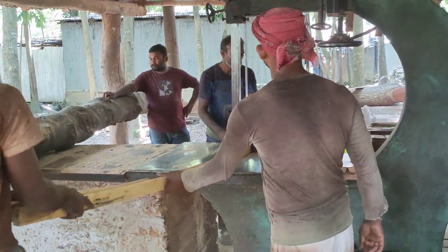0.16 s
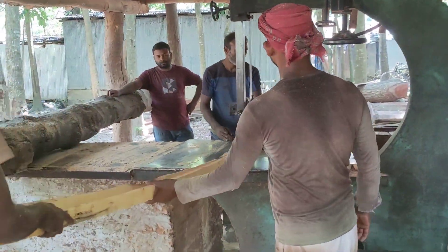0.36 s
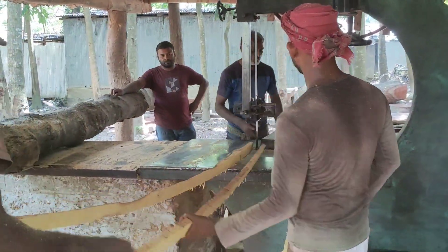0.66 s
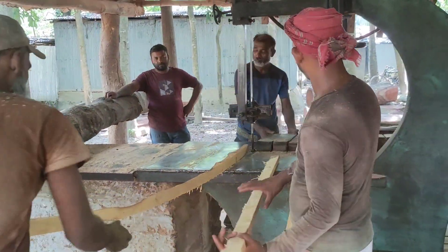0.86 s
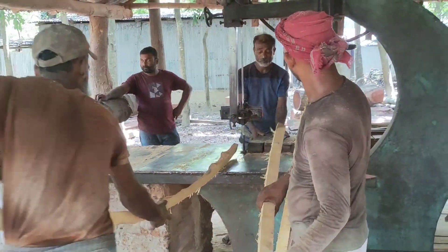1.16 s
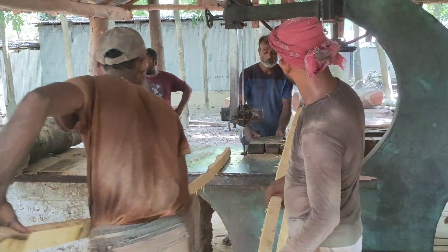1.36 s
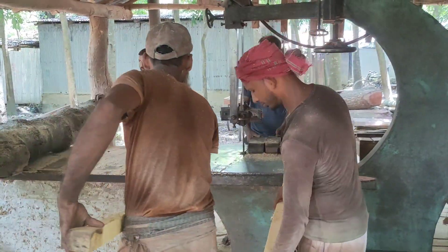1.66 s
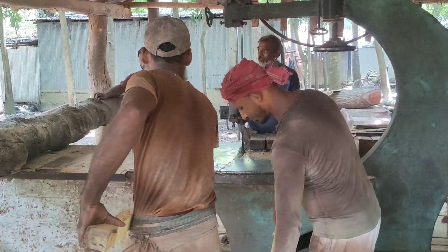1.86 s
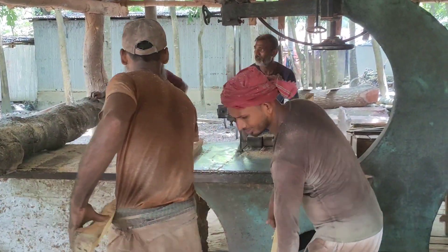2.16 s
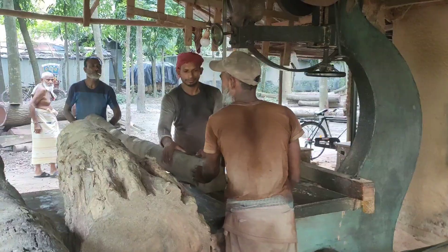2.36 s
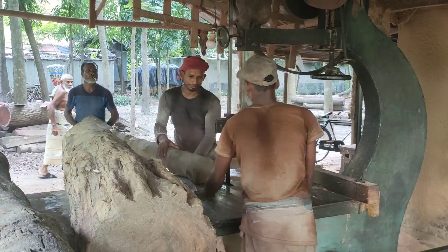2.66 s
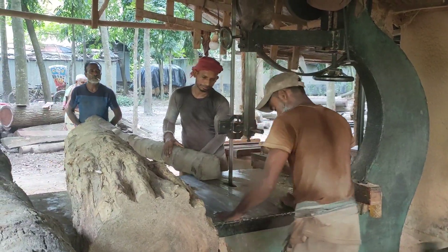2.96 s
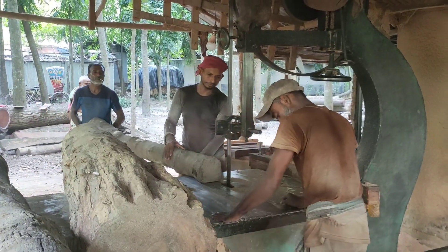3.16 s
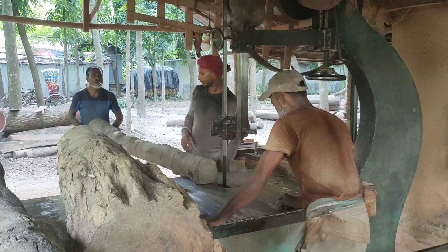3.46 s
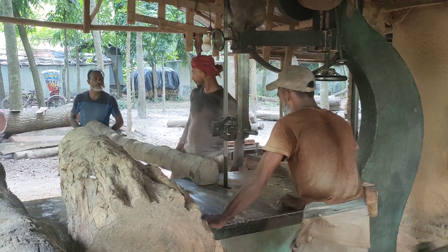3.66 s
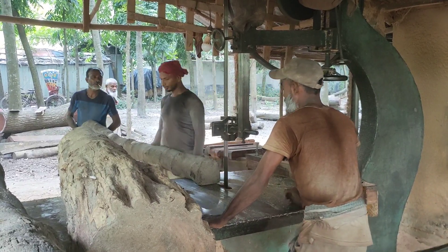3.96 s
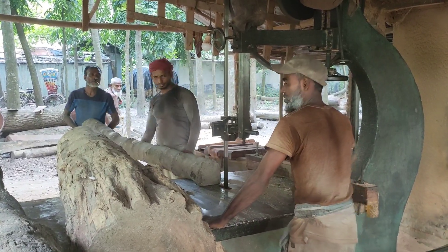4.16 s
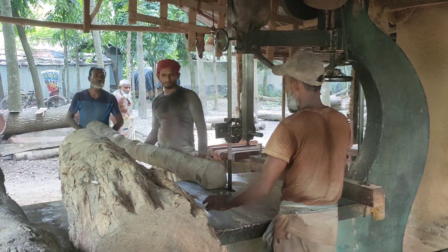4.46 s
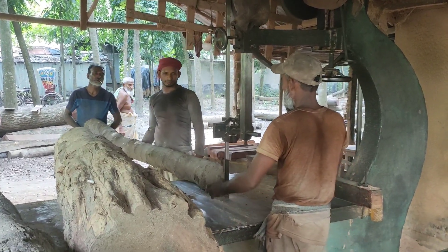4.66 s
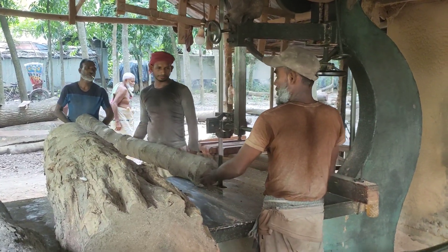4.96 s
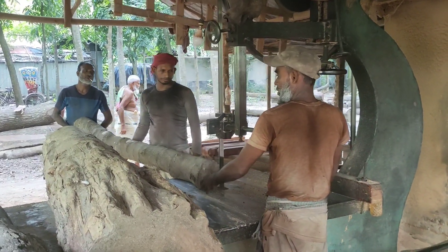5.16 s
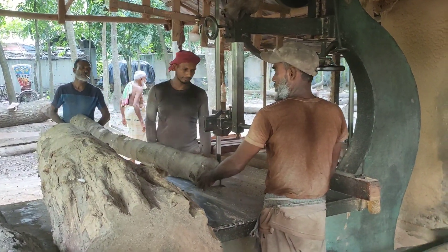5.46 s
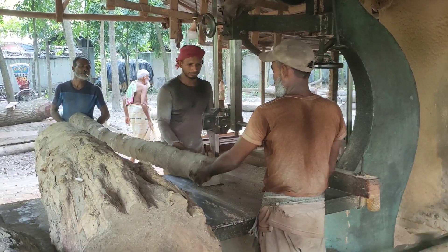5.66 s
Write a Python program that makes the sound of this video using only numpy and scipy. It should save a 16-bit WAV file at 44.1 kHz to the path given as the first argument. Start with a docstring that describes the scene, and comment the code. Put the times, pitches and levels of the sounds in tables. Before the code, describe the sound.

Heard from nearby in wide stereo, a sawmill's big band saw finishes a cut and runs free, its blade rasping and ringing over an iron rattle and a low hum. Wood bumps about and a slat clacks down. The sound cuts out for half a second, then comes back shaking harder, the blade squeaking in its guide between timber knocks. It eases off before starting a hissing cut near the end.

```python
"""A big band saw runs in an open shed, heard first from the outfeed side, where the cut wood comes out,
and then, after a short silence, from beside a log. The blade scrapes through its guides and rings near
2 kHz, and the teeth hiss when they bite. The iron frame rattles and the drive drones, throbbing as the
wheels turn. Timber knocks on the table, a plank is dragged and a slat drops. Beside the log, the blade
also squeaks about once a lap."""
import sys
import numpy as np
from scipy import signal
from scipy.fft import rfft, irfft
from scipy.io import wavfile
from scipy.ndimage import uniform_filter1d

SR = 44100
rng = np.random.default_rng(int(sys.argv[2]) if len(sys.argv) > 2 else 0)


def dump_mix(stems):
    """Bounce the given channels to the path in sys.argv[1] as a 16-bit WAV at rate SR."""
    frames = np.atleast_2d(stems).T  # one column per channel
    limited = np.clip(frames, -1, 1)  # hard clip at full scale
    pcm = np.round(limited * 32767).astype(np.int16)
    wavfile.write(sys.argv[1], SR, pcm)


N = 256220
T = np.arange(N) / SR
FREQ = np.fft.rfftfreq(N, 1 / SR) + 1e-3

# A "colour" says how strong each pitch is. Levels in a table are relative: its source adds a gain.
# colour of the scraping blade on each side: pitch_hz, level_db
OUTFEED_BLADE_COLOUR = [(900, -16.5), (1400, -11), (1920, -7.5), (2060, -4), (2450, -5.5), (3000, -9.5),
                        (3700, -15), (4900, -14.5), (5600, -13), (7800, -18), (8600, -24), (15500, -47.5)]
LOGSIDE_BLADE_COLOUR = [(1000, -8.5), (1500, -16), (1930, -10), (2070, 2), (2600, -1), (3300, -5.5),
                        (3700, -9), (4700, -9), (5700, -13), (7600, -16.5), (8500, -25.5), (15500, -36)]
# pitches at which the blade and the frame ring: pitch_hz, width_hz, lift_db
BLADE_RINGS = [(2057, 85, 6), (2300, 44, 1.5), (2878, 49, 6), (3270, 26, 7.5), (3586, 37, 7),
               (4860, 36, 6.5), (5550, 150, 4)]
FRAME_RINGS = [(593, 27, 7.5), (695, 19, 1), (950, 23, 1), (1007, 31, 4), (1117, 28, 3.5), (1368, 22, 9.5)]
# colour of the rattling frame: pitch_hz, level_db
OUTFEED_FRAME_COLOUR = [(300, -39), (480, -5.5), (600, -2.5), (750, -1.5), (870, 0.5), (1000, -1),
                        (1150, -1), (1270, -14), (1600, -20.5), (2500, -24.5)]
LOGSIDE_FRAME_COLOUR = [(300, -26), (540, -23), (600, -5), (760, 0.5), (900, 3.5), (1130, -1.5),
                        (1230, -6.5), (1650, 0.5), (1900, -1.5), (3000, -13.5)]
# colour of the rumbling wheels: pitch_hz, level_db
OUTFEED_WHEEL_COLOUR = [(20, -25.5), (40, -12.5), (85, -16.5), (115, -21.5), (160, -9), (205, 4), (260, -3),
                        (340, 2), (420, -3), (520, -0.5), (800, -13.5)]
LOGSIDE_WHEEL_COLOUR = [(20, -10), (36, -16.5), (60, -11), (85, -15), (120, -17), (165, -10), (220, -2),
                        (290, -5), (365, 2.5), (410, -9), (455, 1.5), (530, -8.5), (800, -9.5)]
# droning tones of the drive and of the frame: pitch_hz, level_db
OUTFEED_DRIVE_TONES = [(86, -76.5), (200, -53), (862, -39.5)]
LOGSIDE_DRIVE_TONES = [(81, -62), (366, -47), (451, -43.5), (1012, -40)]
LOGSIDE_FRAME_TONES = [(597, -47.5), (645, -47), (665, -48)]
# the teeth are in the wood: start_s, length_s, level_db, swell_db
BITES = [(0.0, 0.232, -32, 5.5), (5.088, 0.03, -28, 2), (5.125, 0.06, -32.5, -1), (5.188, 0.62, -40, 7.5),
         (5.262, 0.39, -32.5, 3)]
# colour of the teeth in a thin board and in the log: pitch_hz, level_db
BOARD_HISS_COLOUR = [(1800, -7), (2400, 14), (3300, -1), (4600, -3.5), (5600, 2), (7100, 4), (8400, -3.5),
                     (9800, -3), (10500, -1.5), (12600, -1.5), (13300, -0.5), (15600, -4.5)]
LOG_HISS_COLOUR = [(2000, 1), (4400, 0), (5100, 5), (5550, 13), (6200, 5), (7900, 2), (8400, -5.5),
                   (9700, -5.5), (10300, -0.5), (12300, -3), (13300, 1), (14800, -3.5), (15600, -3)]
# jolts of blade and timber on the table: start_s, chatter_s, body_db, edge_db
JOLTS = [(0.21, 0.027, -39, -34), (0.366, 0.037, -39, -37), (0.497, 0.028, -36, -35),
         (0.734, 0.028, -34, -50), (0.786, 0.028, -34.5, -48), (0.853, 0.045, -39.5, -38),
         (1.023, 0.024, -29, -34), (1.158, 0.031, -30, -46), (1.332, 0.02, -38.5, -40),
         (1.493, 0.017, -35, -32.5), (2.62, 0.025, -31, -47), (3.005, 0.032, -30.5, -37),
         (3.082, 0.023, -34, -37), (3.175, 0.027, -25.5, -35), (3.236, 0.021, -24, -25.5),
         (3.26, 0.024, -24.5, -45), (3.333, 0.021, -25.5, -23), (3.655, 0.02, -31, -22.5),
         (4.141, 0.032, -33.5, -39), (4.214, 0.013, -28.5, -30), (4.323, 0.018, -33, -35),
         (4.462, 0.018, -31.5, -27.5), (4.997, 0.021, -30, -27.5), (5.337, 0.031, -32.5, -29)]
# colours of a knock's hollow body, hard edge and low thud: pitch_hz, level_db
BODY_COLOUR = [(400, -18.5), (650, -6), (900, 0.5), (1120, 4.5), (1300, -11.5), (2000, -23.5)]
EDGE_COLOUR = [(1000, -18.5), (2100, -7), (3200, -10), (5600, -10.5), (8500, -22), (15000, -35)]
THUD_COLOUR = [(90, -32.5), (200, -4), (360, 2.5), (600, -5.5), (1000, -27.5)]
# colour of a dropped slat: pitch_hz, level_db
SLAT_COLOUR = [(300, -26.5), (700, -5), (1100, 4.5), (1600, -3), (2300, -0.5), (3200, 2), (4500, -7),
               (6000, -15.5), (12000, -31)]
# the saw shakes beside the log, then settles: time_s, blade_db, frame_db
SHAKE_LEVELS = [(2.6, -24, -35), (2.68, -22.5, -32), (3.35, -23.5, -31), (3.47, -23.5, -32.5),
                (4.65, -30, -39), (5.42, -29, -39.5), (5.75, -28.5, -41.5)]
# how strongly the drive rumbles and drones beside the log: time_s, level_db
DRIVE_LEVELS = [(2.56, -34.5), (2.67, -40.5), (3.31, -34), (3.59, -40), (3.66, -34.5), (4.13, -44),
                (4.15, -41.5), (5.34, -41.5), (5.76, -47)]
# the blade squeaks in its guide: peak_s, pitch_hz, level_db
SQUEAKS = [(2.60, 3350, -24), (2.635, 1650, -21), (3.14, 4050, -27), (3.43, 4200, -31), (3.685, 4030, -31),
           (3.975, 4060, -27), (4.228, 3970, -24.5), (4.243, 4600, -28), (4.515, 4130, -27),
           (4.77, 4110, -33), (4.82, 3940, -28), (5.30, 4130, -30)]
# stereo width, as the level of the sides against the centre: pitch_hz, side_db
STEREO_WIDTH = [(30, -21), (60, -14), (140, -7), (220, -6.5), (350, -6.5), (600, -2.5), (1100, 0),
                (2400, -0.66), (15000, -0.4)]


def undb(db):
    """Turn decibels into a number to multiply by."""
    return 10 ** (np.asarray(db) / 20)


def unit(x):
    """Scale a signal to an average (rms) strength of 1."""
    return x / np.sqrt(np.mean(x ** 2))


def curves(rows):
    """Join the rows of a time table with straight lines, one curve for each level column."""
    times, *columns = np.transpose(rows)
    return [np.interp(T, times, column) for column in columns]


def colour(x, points, rings=()):
    """Pass a sound through a body that favours some pitches and rings at a few."""
    hz, db = np.transpose(points)
    octaves_outside = np.abs(np.log2(FREQ / np.clip(FREQ, hz[0], hz[-1])))
    broad_db = np.interp(np.log(FREQ), np.log(hz), db) - 20 * octaves_outside
    ring_db = sum(lift / (1 + (2 * (FREQ - pitch) / width) ** 2) for pitch, width, lift in rings)
    return irfft(rfft(x) * undb(broad_db + ring_db), N)


def wander(speed_hz):
    """A smooth random wobble, about 1 in size."""
    return unit(irfft(rfft(rng.standard_normal(N)) * np.exp(-(FREQ / speed_hz) ** 2), N))


def taps(per_s, scatter_db):
    """Two separate streams of tiny random hits of uneven size."""
    hits = rng.random((2, N)) < per_s / SR
    return hits * rng.choice([-1, 1], (2, N)) * undb(scatter_db * rng.standard_normal((2, N)))


def shed(x, near_s=0.037, roof_s=0.36, roof_db=-4):
    """Two streams, centre and sides, bounce off the machine and the roof and come out left and right."""
    near, roof = (unit(rng.standard_normal((2, N)) * np.exp(-np.log(1000) * T / echo_s))
                  for echo_s in (near_s, roof_s))
    paths = rfft(near + undb(roof_db) * roof)
    # many echoes together favour no range of pitches
    paths /= np.sqrt(uniform_filter1d(np.abs(paths) ** 2, size=160, axis=-1))
    centre, side = irfft(rfft(x) * paths, N)
    side = colour(side, STEREO_WIDTH)  # the bass reaches both ears alike
    return np.array([centre + side, centre - side])


def throb(turn_hz, peak_s, once_db, twice_db):
    """A part that runs unevenly swings the level, in dB, once and twice in each turn."""
    angle = 2 * np.pi * turn_hz * (T - peak_s)
    return once_db * np.cos(angle) + twice_db * np.cos(2 * angle)


def blade(points, db, flutter_db=1.24):
    """The teeth and the blade's back graze the guides; the fluttering steel band rings."""
    scrape = taps(per_s=2500, scatter_db=4) * undb(flutter_db * wander(21))
    return unit(shed(colour(scrape, points, BLADE_RINGS))) * undb(db)


def frame(points, db, shake_db=0.5):
    """Loose guards and the table chatter against the iron frame."""
    chatter = taps(per_s=900, scatter_db=4.5) * undb(shake_db * wander(25))
    return unit(shed(colour(chatter, points, FRAME_RINGS))) * undb(db)


def wheels(points, db):
    """The belt and the wheel rims rumble."""
    return unit(shed(colour(taps(per_s=1500, scatter_db=2.4), points))) * undb(db)


def drone(tones, waver, swell_db, gain_db, spread=0.6):
    """Tones of the drive or frame waver in pitch and loudness with the belt."""
    out = 0
    for hz, db in tones:
        phase = 2 * np.pi * np.cumsum(hz * (1 + waver * wander(30.8))) / SR
        # higher tones arrive further out of step at the two ears
        lag = np.array([[1], [-1]]) * spread * np.sqrt(hz / 400) * wander(11.4)
        tone = np.sin(phase + lag) * undb(swell_db * wander(18))
        out = out + unit(tone) * undb(db + gain_db)
    return out


def contact(start_s, hold_s, fade_s, rise_s=0.0025):
    """The force of one contact: it rises quickly, holds, then dies away."""
    age = T - start_s
    return np.clip(age / rise_s, 0, 1) * np.exp(-np.clip((age - hold_s) / fade_s, 0, 20))


def bite():
    """The force of the teeth in the wood: each cut catches, changes as wood is fed in, and lets go."""
    force = 0
    for start_s, length_s, db, swell_db in BITES:
        progress = np.clip((T - start_s) / length_s, 0, 1)
        grip = contact(start_s, length_s, fade_s=0.022, rise_s=0.0054)
        force = force + grip * undb(db + swell_db * progress)
    return force


def under_load(change_db):
    """A gain that follows the cutting force and reaches change_db at the hardest bite."""
    load = bite()
    return undb(change_db * load / load.max())


def teeth(points, idle_db, cut_gain_db):
    """Running teeth brush the sawn slot; in a cut, wood fibres snap so fast that they hiss."""
    hiss = unit(shed(colour(taps(per_s=7000, scatter_db=4), points)))
    return hiss * np.hypot(undb(idle_db), bite() * undb(cut_gain_db))


def knocks(body_gain_db=3.5, edge_gain_db=2, thud_gain_db=-8):
    """Timber and blade jolt against the table: a hollow body with its thud, and a hard edge."""
    body, edge, thud = (
        unit(shed(colour(taps(per_s=2500, scatter_db=2.3), points), near_s=0.024, roof_db=-10))
        for points in (BODY_COLOUR, EDGE_COLOUR, THUD_COLOUR))
    push = scrape = 0
    for start_s, chatter_s, body_db, edge_db in JOLTS:
        force = contact(start_s, chatter_s, fade_s=0.015)
        push = push + force * undb(body_db)
        scrape = scrape + force * undb(edge_db)
    hollow = body * undb(body_gain_db) + thud * undb(thud_gain_db)
    return push * hollow + scrape * edge * undb(edge_gain_db)


def plank(pitch_hz=338, db=-37):
    """A plank dragged over the table's edge hums briefly."""
    hum = np.sin(2 * np.pi * pitch_hz * T)
    return hum * contact(start_s=1.357, hold_s=0.065, fade_s=0.022) * undb(db)


def slat(db=-18):
    """A sawn slat is dropped and clacks."""
    clack = unit(shed(colour(taps(per_s=3000, scatter_db=2.1), SLAT_COLOUR)))
    return clack * contact(start_s=1.676, hold_s=0.013, fade_s=0.02) * undb(db)


def squeaks(fade_s=0.021, glide_per_s=1.5, roughness=0.05):
    """The blade gives a short, rough, rising squeak in its guide about once a lap."""
    slip = roughness * np.array([wander(496.6), wander(513)])
    out = 0
    for peak_s, hz, db in SQUEAKS:
        age = np.clip(T - peak_s, -0.1, 0.1)
        phase = 2 * np.pi * np.cumsum(hz * (1 + glide_per_s * age + slip), axis=-1) / SR
        out = out + np.sin(phase) * np.exp(-(age / fade_s) ** 2) * undb(db)
    return shed(out, near_s=0.021, roof_db=-36)


def outfeed(turn_hz=6.17, peak_s=0.369, frame_lag_s=0.014, free_s=0.28, calm_s=0.14, calm_db=-6.5):
    """The saw ends a cut and runs free, throbbing with its wheels, while wood is put aside."""
    scrape_db = throb(turn_hz, peak_s, once_db=0.45, twice_db=0.35)
    shake_db = throb(turn_hz, peak_s + frame_lag_s, once_db=1.0, twice_db=0.76)
    brush_db = throb(turn_hz, peak_s, once_db=1.5, twice_db=1.2)
    band = blade(OUTFEED_BLADE_COLOUR, db=-28 + scrape_db) * under_load(change_db=2)
    rattle = frame(OUTFEED_FRAME_COLOUR, db=-33.5 + shake_db)
    rumble = wheels(OUTFEED_WHEEL_COLOUR, db=-42.5 + shake_db)
    hum = drone(OUTFEED_DRIVE_TONES, waver=0.016, swell_db=5, gain_db=-1.5) * undb(shake_db)
    hiss = teeth(BOARD_HISS_COLOUR, idle_db=-36.5 + brush_db, cut_gain_db=2)
    # the cut lets go, and the machine is briefly calm before its rattle builds again
    calm = (T > free_s) * np.exp(-((T - free_s) / calm_s) ** 2)
    return band + (rattle + rumble + hum) * undb(calm_db * calm) + hiss + plank() + slat()


def logside(turn_hz=6.26, peak_s=2.62, lap_hz=3.64, hiss_follow=0.38, lap_follow=1.4, hum_follow=1.25):
    """The saw shakes harder, rubs once a lap, settles, and bites into the next log."""
    blade_db, frame_db = curves(SHAKE_LEVELS)
    drive_db, = curves(DRIVE_LEVELS)
    settle_db = blade_db - blade_db.max()
    turn_db = throb(turn_hz, peak_s, once_db=0.38, twice_db=0.4)
    brush_db = throb(turn_hz, peak_s, once_db=0.5, twice_db=1.2)
    # the blade rubs less on each lap as it settles
    lap_db = throb(lap_hz, peak_s=2.782, once_db=3.5, twice_db=-1.5) * undb(lap_follow * settle_db)
    band = blade(LOGSIDE_BLADE_COLOUR, db=blade_db + turn_db + 3.5)
    rattle = frame(LOGSIDE_FRAME_COLOUR, db=frame_db + turn_db + 7.5)
    rumble = wheels(LOGSIDE_WHEEL_COLOUR, db=drive_db + 0.5)
    hum = drone(LOGSIDE_DRIVE_TONES, waver=0.01302, swell_db=5.5, gain_db=6.5)
    hum *= undb(hum_follow * (drive_db - drive_db.max()))
    drive = (rumble + hum) * under_load(change_db=-4)  # it labours in the cut and gets quieter
    idle_db = -29 + hiss_follow * settle_db + lap_db + brush_db
    hiss = teeth(LOG_HISS_COLOUR, idle_db, cut_gain_db=4)
    frame_hum = drone(LOGSIDE_FRAME_TONES, waver=0.0128, swell_db=7.5, gain_db=3.5, spread=0.82)
    return band + rattle + drive + frame_hum + hiss + squeaks()


def scene(stop_s=1.921, stop_fade_s=0.0034, resume_s=2.507, resume_fade_s=0.0057):
    """The two sides of the saw, with dead silence between them."""
    before = np.exp(-np.clip((T - stop_s) / stop_fade_s, 0, 20))
    after = np.exp(-np.clip((resume_s - T) / resume_fade_s, 0, 20))
    return before * outfeed() + after * logside() + (before + after) * knocks()


def record(dry, balance_db=0.34, top_hz=15750):
    """Make the left a little louder than the right and cut the highest treble."""
    tilted = dry * undb(np.array([[1], [-1]]) * balance_db / 2)
    treble_cut = signal.ellip(12, 0.1, 90, top_hz, fs=SR, output="sos")
    return signal.sosfilt(treble_cut, tilted)


dry = scene()
out = record(dry)
dump_mix(out)
```